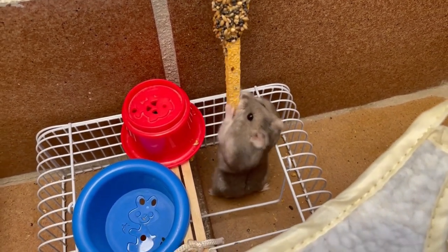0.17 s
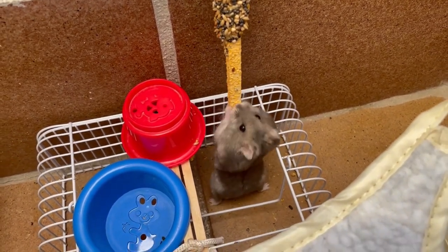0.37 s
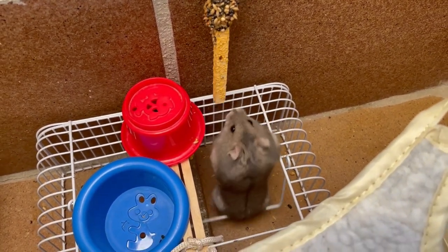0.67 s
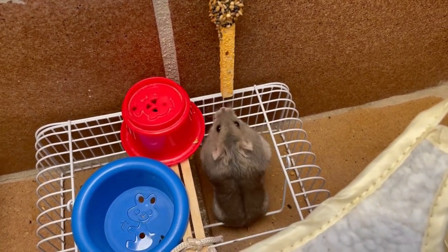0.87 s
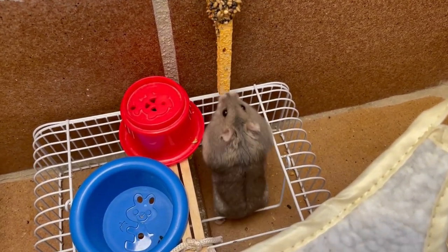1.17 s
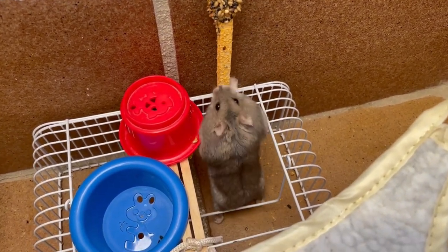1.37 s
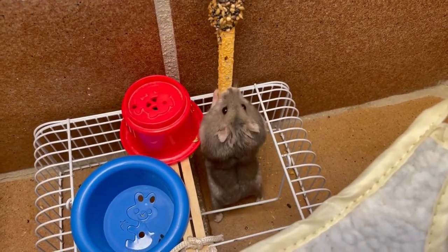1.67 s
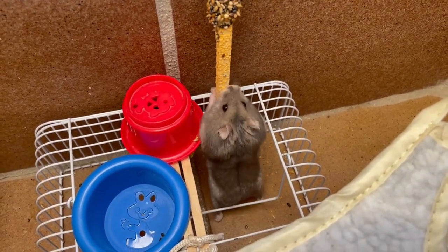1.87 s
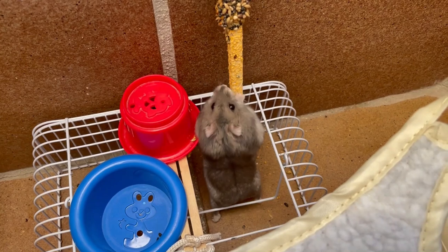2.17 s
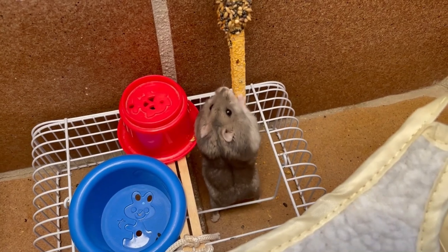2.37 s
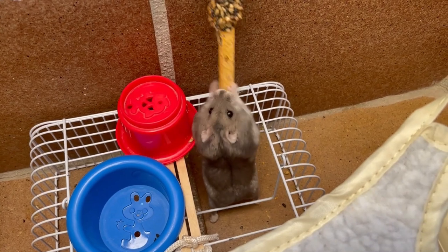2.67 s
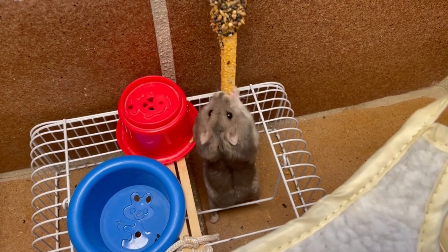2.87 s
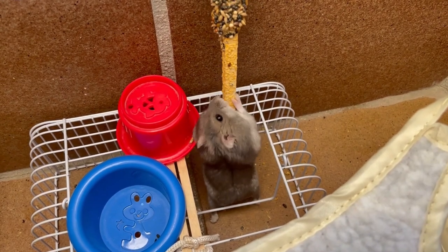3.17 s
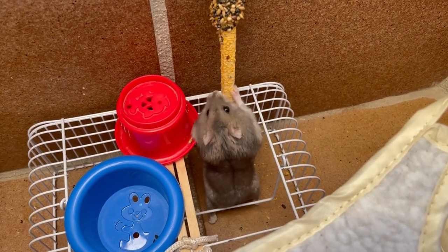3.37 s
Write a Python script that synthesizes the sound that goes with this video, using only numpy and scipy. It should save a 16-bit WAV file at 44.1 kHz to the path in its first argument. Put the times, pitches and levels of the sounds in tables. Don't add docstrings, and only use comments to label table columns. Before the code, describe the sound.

A hamster gnaws a hard seed stick close to a stereo microphone, in three bouts of bright scrapes and sharp cracks with short pauses; a few light hollow knocks follow late, over low muffled traffic rumble.

```python
import sys
import numpy as np
from scipy import signal
from scipy.fft import rfft, irfft
from scipy.io import wavfile

SR = 44100
rng = np.random.default_rng(int(sys.argv[2]) if len(sys.argv) > 2 else 0)


def makeup_ratio(level_db):
    decades = np.asarray(level_db, float) / 20
    return 10 ** decades


def dump_mix(stems):
    frames = np.atleast_2d(stems).T
    limited = np.clip(frames, -1, 1)
    pcm = np.round(limited * 32767).astype(np.int16)
    wavfile.write(sys.argv[1], SR, pcm)


N = 155232


def rms_one(x):
    return x / np.sqrt(np.mean(x ** 2) + 1e-20)


def at_hz(points, hz):
    table_hz, values = np.transpose(points)
    return np.interp(np.log(hz), np.log(table_hz), values)


def drift(rate):
    step, settle = 40, 2000
    r = np.exp(-2 * np.pi * rate * step / SR)
    chance = rng.standard_normal(N // step + 2 + settle)
    slow = signal.lfilter([1], [1, -2 * r, r * r], chance)[settle:]
    return np.interp(np.arange(N) / step, np.arange(len(slow)), rms_one(slow - slow.mean()))


def shaped_noise(spectrum, patchy_db, likeness):
    hz = np.maximum(np.fft.rfftfreq(N, 1 / SR), 1)
    octaves_outside = abs(np.log2(np.clip(hz, spectrum[0][0], spectrum[-1][0]) / hz))
    level_db = at_hz(spectrum, hz) - 40 * octaves_outside
    mid, side = rfft(rng.standard_normal((2, N))) * makeup_ratio(level_db)
    like = np.clip(at_hz(likeness, hz), 0, 1)
    pair = np.sqrt(1 + like) * mid + np.sqrt(1 - like) * side * [[1], [-1]]
    place = np.clip(2 * np.log2(hz / 40), 0, 15)
    out = 0
    for k in range(16):
        band = np.maximum(1 - abs(place - k), 0)
        out = out + irfft(pair * band, N) * makeup_ratio(patchy_db * drift(11.9))
    return rms_one(out)


def road_noise():
    # time in seconds, level in dB.
    traffic = [
        (0, -56),
        (.6, -54),
        (1.351, -53),
        (1.599, -55),
        (2.2, -58),
        (3.52, -56),
    ]
    # frequency in Hz, level in dB per Hz.
    through_walls = [(150, 1), (450, -12), (750, -12), (960, -10), (1250, -17), (2350, -25), (3300, -36)]
    # frequency in Hz, level in dB per Hz.
    faint_top = [(4300, -40.5), (5300, -45.5), (7000, -45.5), (10000, -52), (13700, -59), (14300, -78)]
    # frequency in Hz, likeness of left and right (0 to 1).
    likeness = [(170, 1), (250, 0.06), (500, 0.4), (1400, 0.041), (12000, 0.92)]
    brightens = 0.95
    s, db = np.transpose(traffic)
    busy_db = np.interp(np.arange(N) / SR, s, db)
    road = shaped_noise(through_walls + faint_top, patchy_db=1.4, likeness=likeness)
    hiss_band = signal.butter(2, [2100, 4300], "band", fs=SR, output="sos")
    hiss = signal.sosfilt(hiss_band, road)
    hiss_gain = makeup_ratio(brightens * (busy_db - busy_db.mean()))
    return makeup_ratio(busy_db) * (road + hiss * (hiss_gain - 1))


def glides(rows, wobble, rate):
    t, out = np.arange(N) / SR, np.zeros(N)
    for s, length, from_hz, to_hz, db in rows:
        u = np.clip((t - s) / length, 0, 1)
        hz = from_hz + (to_hz - from_hz) * u
        turn = 2 * np.pi * (np.cumsum(hz) / SR + rng.random())
        level = np.sqrt(2) * makeup_ratio(db) * np.sin(np.pi * u) * (1 + wobble / 2 * drift(rate))
        out += level * np.sin(turn + wobble * drift(rate))
    return out


def rumble():
    # frequency in Hz, level in dB per Hz.
    low_spectrum = [(38, 14), (80, 24.5), (135, 12), (155, 0.5), (230, -33.5)]
    # start in seconds, length in seconds, from Hz, to Hz, level in dB.
    swells = [(-.2, 0.29, 44.7, 44.6, -34), (-.2, 0.45, 79.5, 80.7, -39), (.55, 0.3, 124.7, 129.1, -49.5),
              (1.0, 0.22, 132.1, 131.2, -47), (1.0, 0.64, 86.75, 84.4, -41), (1.25, 0.3, 131, 131.2, -41.5),
              (1.3, 0.64, 45, 44.6, -41), (1.45, 0.62, 80.77, 85.4, -39.5),
              (1.95, 0.51, 130.6, 128.4, -46.5), (2.1, 2.19, 49.12, 79.85, -38.5),
              (2.0, 1.005, 96.54, 108.9, -44.5), (3.05, 0.56, 110.2, 115.4, -41.5),
              (2.4, 0.93, 128.3, 136.1, -41.5), (2.55, 1.18, 44.04, 46.2, -47.5),
              (2.9, 0.48, 83.1, 79.4, -42.5)]
    rumble_db, pan_db = -42.5, 0.96
    noise = shaped_noise(low_spectrum, patchy_db=2.5, likeness=[(20, 0.99), (20000, 0.99)])
    bass = makeup_ratio(rumble_db) * noise + glides(swells, wobble=0.6, rate=4.9)
    return bass * makeup_ratio([[-pan_db], [pan_db]])


def far_whines():
    # start in seconds, length in seconds, from Hz, to Hz, level in dB.
    whines = [(.1, .5, 358, 358, -66), (1.05, .7, 360, 360, -65), (.8, .85, 612, 614, -62),
              (1.4, .7, 615, 612, -69), (.35, .5, 612, 615, -71), (2.7, .7, 610, 604, -68),
              (-.2, .36, 897, 897, -64), (.15, .6, 892, 890, -65), (.5, .5, 878, 935, -65),
              (.75, .42, 925, 975, -64), (1.15, .4, 985, 1035, -66), (1.2, .4, 860, 915, -67),
              (.9, .4, 860, 880, -68)]
    whine = glides(whines, wobble=0.7, rate=12)
    return np.array([whine, np.roll(whine, 8)])


def slips():
    slips_per_s, spread_db = 5500, 4.2
    sizes = makeup_ratio(spread_db * np.minimum(rng.exponential(1, N), 4)) * rng.choice([-1, 1], N)
    return rms_one(sizes * (rng.random(N) < slips_per_s / SR))


def resonate(x, peaks):
    stick_q, grip_db = 8, 1.8
    pulse, out = np.eye(1, 2048)[0], 0
    both = np.concatenate([pulse, x + 1e-18])
    for k, (hz, db) in enumerate(peaks):
        r = np.exp(-np.pi * hz / stick_q / SR)
        grip = makeup_ratio(db + grip_db * np.concatenate([0 * pulse, drift(30)]))
        feed = (1 - r * r) / 2 * np.array([1, 0, -1])
        ring = [1, -2 * r * np.cos(2 * np.pi * hz / SR), r * r]
        out = out + (-1) ** k * grip * signal.lfilter(feed, ring, both)
    return out[len(pulse):] / np.sqrt(np.sum(out[:len(pulse)] ** 2))


def lone_modes(grain):
    # start in seconds, level in dB, mode in Hz, decay in seconds.
    deep_bites = [(.243, -70, 3350, .018), (.526, -64, 3350, .011), (.628, -75, 4500, .01),
                  (2.643, -72, 3250, .012), (.148, -63, 9500, .025), (.848, -75, 6800, .01),
                  (1.158, -73, 10500, .01), (3.48, -83, 7500, .012), (1.587, -68, 4600, .012),
                  (2.022, -72, 3000, .008), (2.115, -67, 4600, .01), (2.297, -70, 3300, .012),
                  (2.707, -67, 4600, .008), (1.725, -70, 2800, .012), (3.066, -74, 3400, .008),
                  (3.066, -62, 9300, .012), (1.385, -70, 7200, .025), (2.638, -64, 9500, .02),
                  (1.81, -75, 2700, .015), (.162, -72, 2800, .008), (2.116, -72, 3200, .008),
                  (2.645, -71, 4700, .012)]
    deep_q = 16
    out, t = np.zeros(N + SR), np.arange(SR // 10) / SR
    for s, db, hz, decay in deep_bites:
        r, i = np.exp(-np.pi * hz / deep_q / SR), int(s * SR)
        push = makeup_ratio(db) * np.exp(-t / max(decay, .002)) * np.resize(grain[i:], len(t))
        feed = np.sqrt(1 - r * r) * np.array([1, 0, -1])
        ring = [1, -2 * r * np.cos(2 * np.pi * hz / SR), r * r]
        out[i:i + len(t)] += signal.lfilter(feed, ring, push)
    return out[:N] * np.sqrt(.5)


def gnawing():
    # peak time in seconds, level in dB, rise in ms per 12 dB, fall in ms per 12 dB,
    # share of the top over the body in dB.
    first_bout = [(0.1663, -54, 8, 8, -11), (0.246, -63.5, 17, 25, -1), (0.263, -69.5, 12, 34, -7),
                  (0.2957, -85, 2, 15, -4.0), (0.332, -79, 16, 25, -20), (0.3896, -81, 6, 43, -16),
                  (0.4103, -68, 1.5, 3.5, -3), (0.4189, -77, 46, 19, -2), (0.5272, -60.5, 2.8, 10, -2),
                  (0.6312, -68, 9, 10, -6), (0.852, -82, 2, 9, -17)]
    second_bout = [(1.374, -69, 10, 23, -28), (1.393, -64, 20, 42, -10), (1.428, -57, 4.6, 9.9, -12),
                   (1.437, -55.5, 2, 6.5, -14), (1.4867, -74, 13, 5.1, -14), (1.549, -62, 17, 27, -10),
                   (1.589, -56, 5.5, 5.5, -17), (1.5968, -61.5, 4.4, 11.6, -20),
                   (1.6577, -73, 6.3, 8.8, -20), (1.732, -49.5, 5.1, 7.5, -5), (1.752, -70.5, 8.0, 20, -11),
                   (1.802, -63.5, 4.3, 3.8, -10.0), (1.8493, -62.5, 6.5, 4.0, 0),
                   (1.8618, -63.5, 1.9, 2.3, -7), (1.903, -65.5, 10.5, 18, -7), (1.939, -73, 13, 24, -12),
                   (1.9867, -76, 13, 9.5, -17), (2.026, -52.5, 3.9, 4.7, -3), (2.066, -74, 21, 160, -3),
                   (2.1173, -53.5, 9.8, 12, -3)]
    third_bout = [(2.2408, -89, 2.3, 4.6, 26), (2.2979, -51.5, 1, 14, 9), (2.3068, -55, 3.3, 2.5, -1),
                  (2.3284, -62, 1.8, 7, -6), (2.3443, -72.5, 6.3, 15, -14), (2.4271, -58, 1.5, 9.4, 0.5),
                  (2.4796, -66, 2.5, 8.6, 4), (2.5055, -76, 2.4, 9.8, -16), (2.519, -57.5, 2.1, 5, 2),
                  (2.5357, -56, 1, 10, -14), (2.557, -55, 4.1, 2.4, -3), (2.6041, -62, 1.5, 4.1, 3),
                  (2.611, -59, 1.7, 27, 3), (2.6488, -56, 12, 12, -3), (2.6922, -74, 24, 7.7, -8),
                  (2.71, -48.5, 2.6, 8.3, 2.5), (2.7499, -74, 10.7, 8.6, -10), (2.765, -70, 8.7, 38, -5),
                  (3.0673, -55, 3.2, 9.4, 3), (3.09, -73.5, 10.0, 32, -17), (3.1263, -68, 2, 14, -4),
                  (3.2047, -61.5, 16.9, 16, -3), (3.2474, -72.5, 8.6, 20, -14), (3.4889, -80.5, 16, 6, -22)]
    # time in seconds, peak in dB.
    cracks = [(0.165, -37), (0.2438, -42), (0.409, -49), (0.4184, -63), (0.5254, -49), (0.63, -63),
              (1.4252, -46), (1.4366, -40), (1.5883, -45), (1.5977, -39), (1.6571, -64), (1.7254, -47),
              (1.7334, -47), (1.7998, -55), (1.8467, -60), (1.8612, -58), (1.9024, -56), (1.9114, -62),
              (1.937, -65), (2.0235, -41), (2.1161, -45), (2.2967, -34.5), (2.3082, -33), (2.3144, -52),
              (2.3274, -52), (2.3424, -63), (2.4268, -37), (2.4783, -58), (2.5042, -65), (2.5172, -52),
              (2.5244, -65), (2.5341, -48), (2.5573, -45), (2.604, -53), (2.6105, -51), (2.7067, -33),
              (2.7147, -42), (2.7442, -52), (2.7504, -60), (3.0623, -50), (3.1248, -71), (3.247, -56)]
    # frequency in Hz, level in dB.
    stick_body = [(2750, -12), (3400, -10), (4580, -11.5), (5600, -8.5), (6750, -3), (7600, -4),
                  (9300, -2.6), (10300, -4.5)]
    stick_top = [(11300, -1.5), (12600, -1.5), (14000, 0), (15600, 1.5)]
    bite_db, crack_db, crack_top_db = -1.5, -5, 0
    t, body, top, grain = np.arange(N) / SR, np.zeros(N), np.zeros(N), slips()
    for s, db, rise_ms, fall_ms, top_db in first_bout + second_bout + third_bout:
        near = slice(max(int((s - .15) * SR), 0), int((s + .2) * SR))
        ms = (t[near] - s) * 1000
        steps_down = np.where(ms < 0, -ms / max(rise_ms, .3), ms / max(fall_ms, .3))
        power = makeup_ratio(db + bite_db - 12 * steps_down) ** 2
        share = 1 / (1 + makeup_ratio(-top_db) ** 2)
        body[near] += power * (1 - share)
        top[near] += power * share
    s, db = np.transpose(cracks)
    ticks = np.zeros(N)
    ticks[(s * SR).astype(int)] = makeup_ratio(db + crack_db)
    body_ring = resonate(grain * np.sqrt(body) + ticks, stick_body)
    top_ring = resonate(grain * np.sqrt(top) + makeup_ratio(crack_top_db) * ticks, stick_top)
    return body_ring + top_ring + lone_modes(grain)


def burst(rows, decay):
    t = np.arange(N) / SR
    return sum(makeup_ratio(db) * (t > s) * np.exp(-np.maximum(t - s, 0) / decay) for s, db in rows)


def knocks():
    # time in seconds, peak in dB.
    knock_times = [
        (2.4972, -47.5),
        (2.779, -58),
        (2.9372, -53.5),
    ]
    # frequency in Hz, level in dB.
    wall_modes = [(1150, 1), (1370, 1.5), (1850, -8), (2350, -5.5), (2750, -12), (3080, -5), (3400, -11)]
    rattle_s, knock_db, wall_t60_s = 0.031, -26.5, 0.012
    out, push = np.zeros(N), makeup_ratio(knock_db) * burst(knock_times, rattle_s)
    for hz, db in wall_modes:
        r, w = makeup_ratio(-60 / (wall_t60_s * SR)), 2 * np.pi * hz / SR
        rattle = push * rng.standard_normal(N) + 1e-18
        out += signal.lfilter([0, makeup_ratio(db) * np.sin(w)], [1, -2 * r * np.cos(w), r * r], rattle)
    return out


def wash(x, t60):
    t = np.arange(SR // 3) / SR
    tails = rng.standard_normal((2, len(t))) * makeup_ratio(-60 * t / t60) * (t > 0)
    tails /= np.sqrt(np.sum(tails ** 2, axis=1, keepdims=True))
    return signal.fftconvolve(x[None], tails, axes=1)[:, :N]


def in_pen(near):
    pen_t60_s, pen_db = 0.079, -6.5
    floor_t60_s, floor_db = 0.035, -6.5
    pen = makeup_ratio(pen_db) * wash(near, pen_t60_s)
    floor = makeup_ratio(floor_db) * np.diff(wash(near, floor_t60_s), axis=0) * np.sqrt(.5) * [[1], [-1]]
    return near + pen + floor


def scene():
    outside = road_noise() + rumble() + far_whines()
    return in_pen(gnawing() + knocks()) + outside


def band_limit(x):
    return signal.sosfilt(signal.butter(12, 16510, fs=SR, output="sos"), x)


def record(dry):
    top_cut = signal.cheby2(10, 40, 16300, fs=SR, output="sos")
    mix = signal.sosfilt(top_cut, dry)
    return band_limit(mix)


dry = scene()
out = record(dry)
dump_mix(out)
```